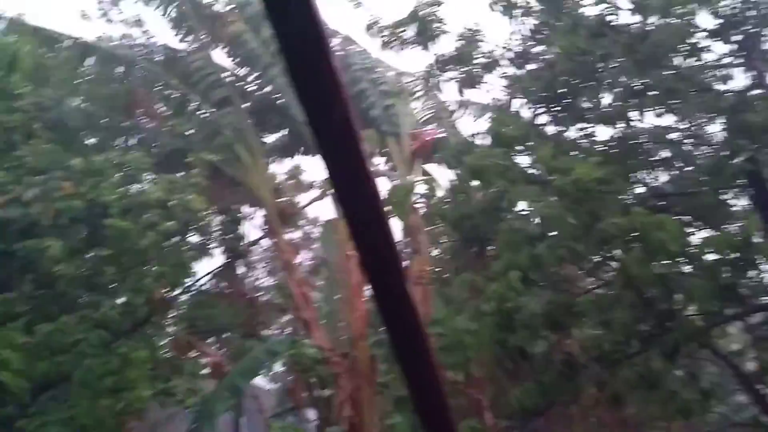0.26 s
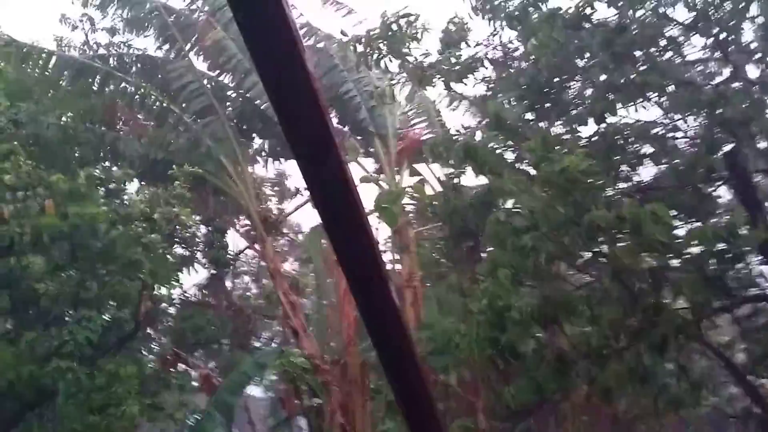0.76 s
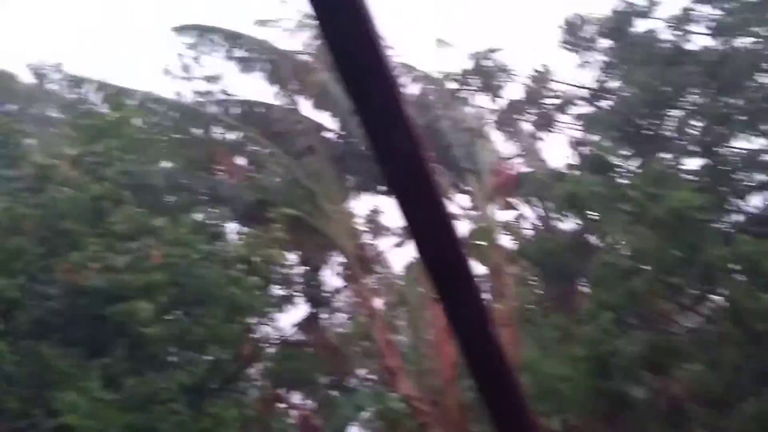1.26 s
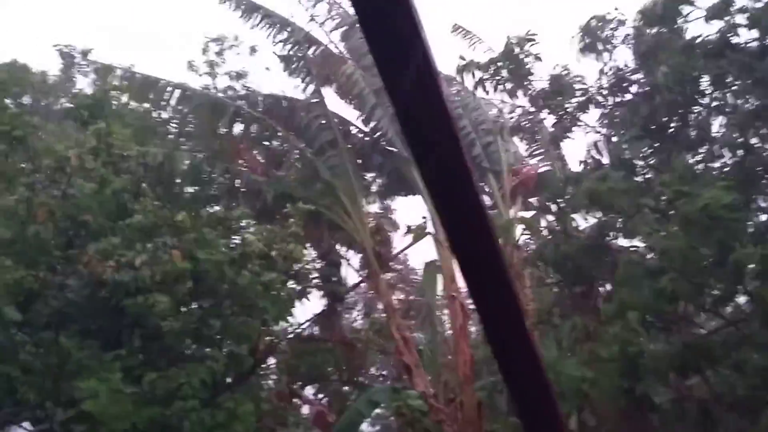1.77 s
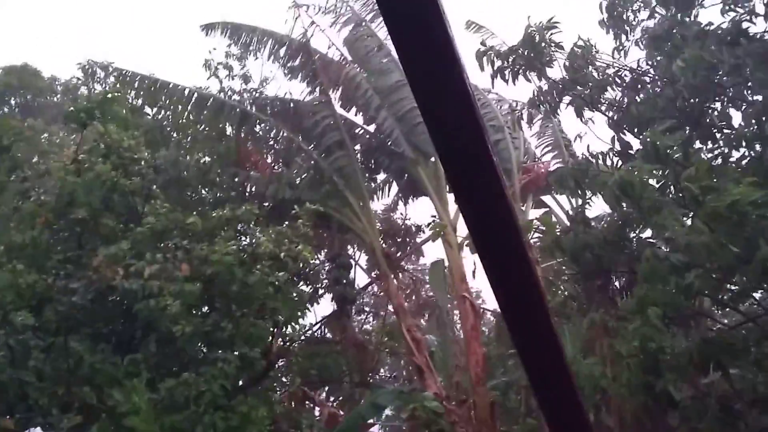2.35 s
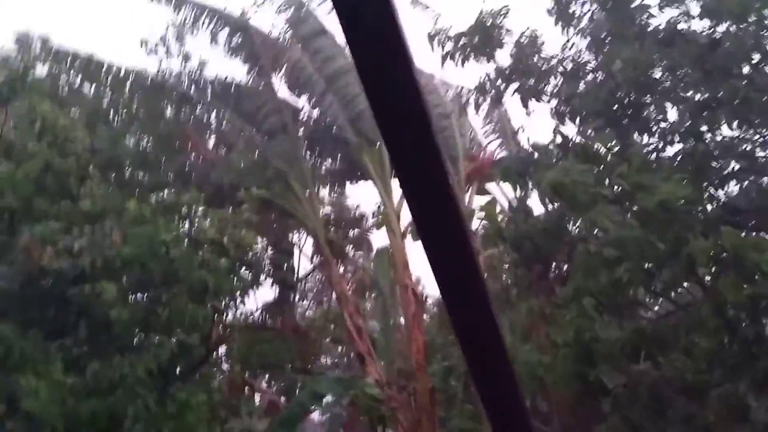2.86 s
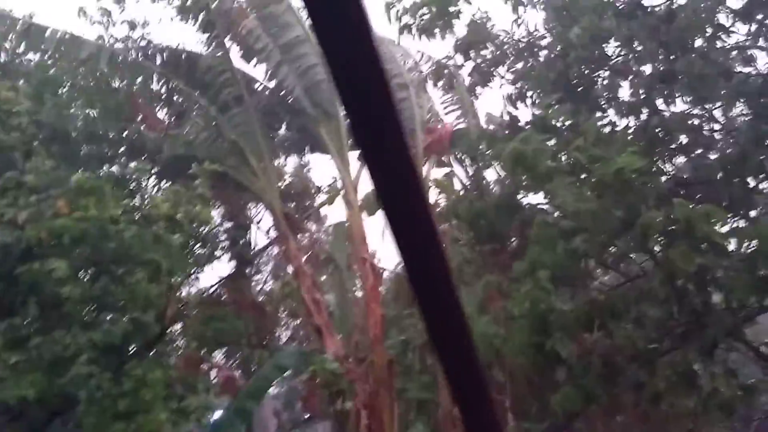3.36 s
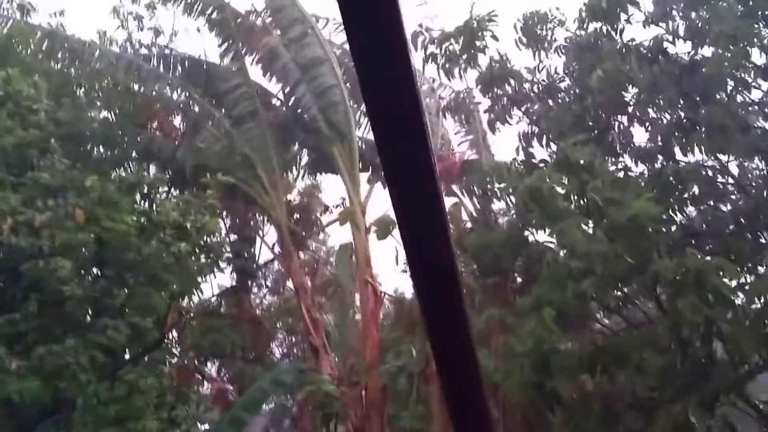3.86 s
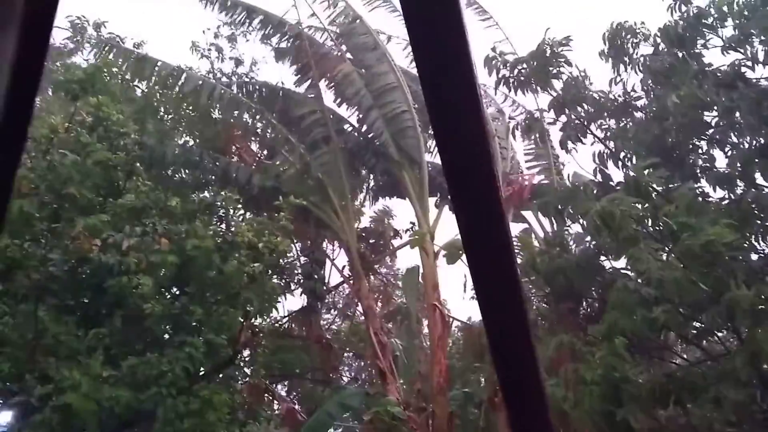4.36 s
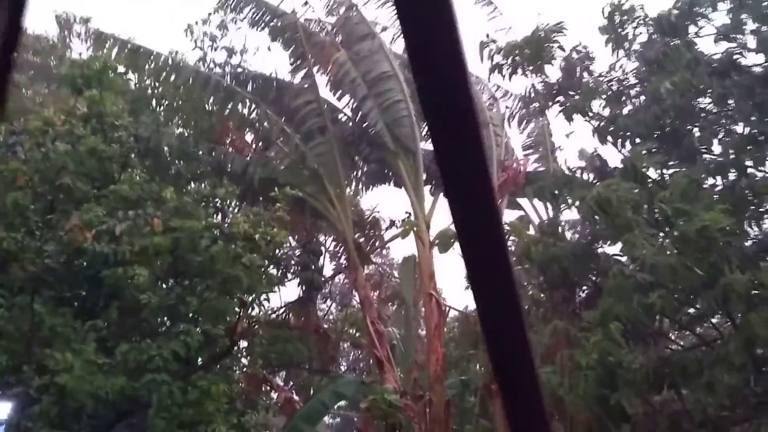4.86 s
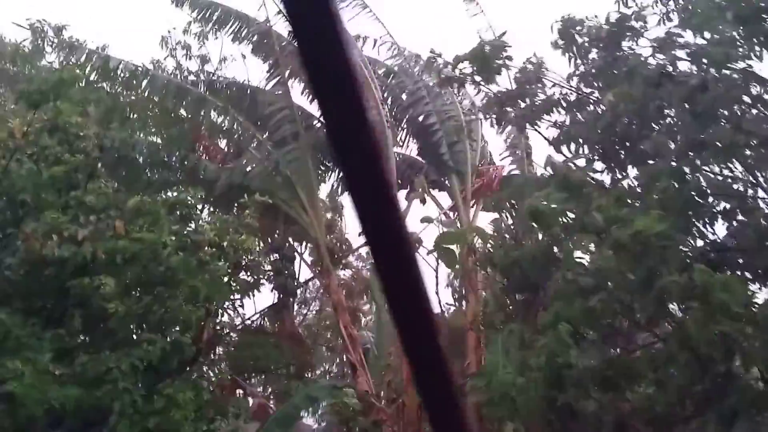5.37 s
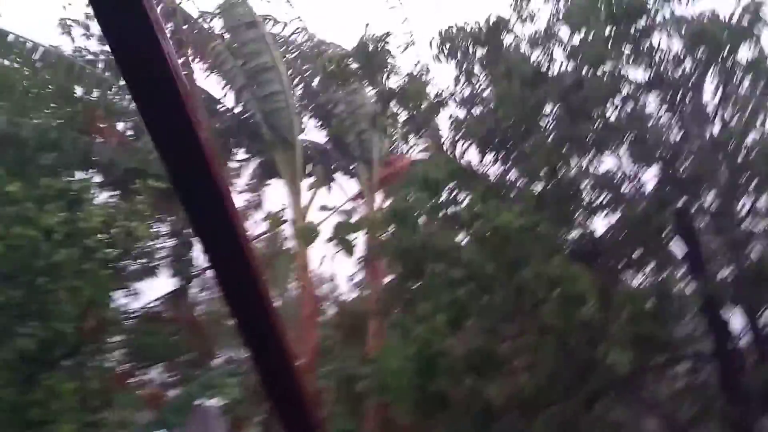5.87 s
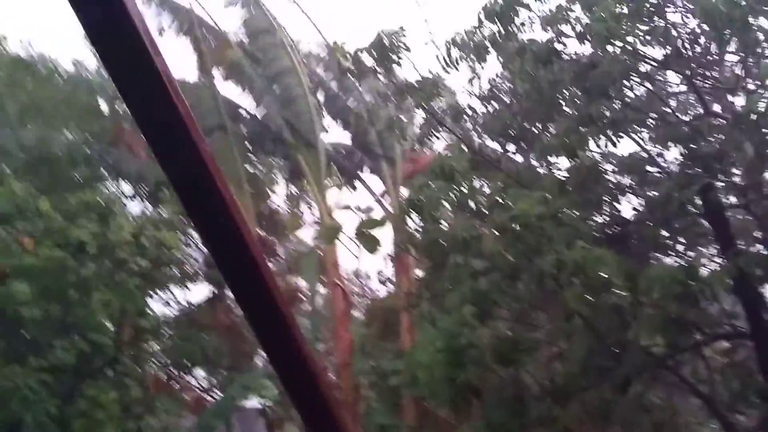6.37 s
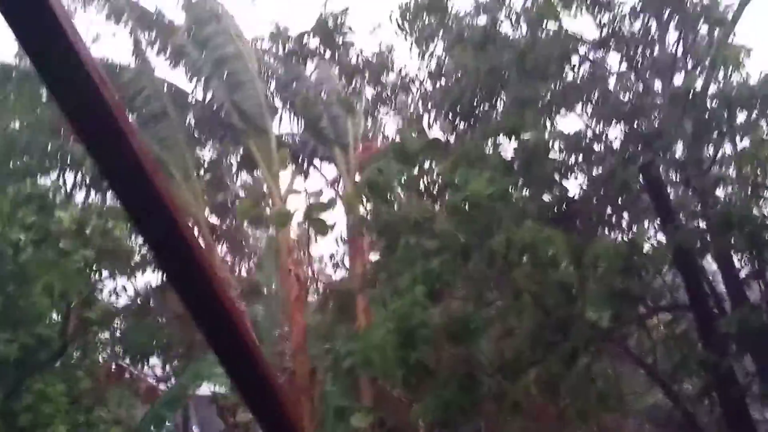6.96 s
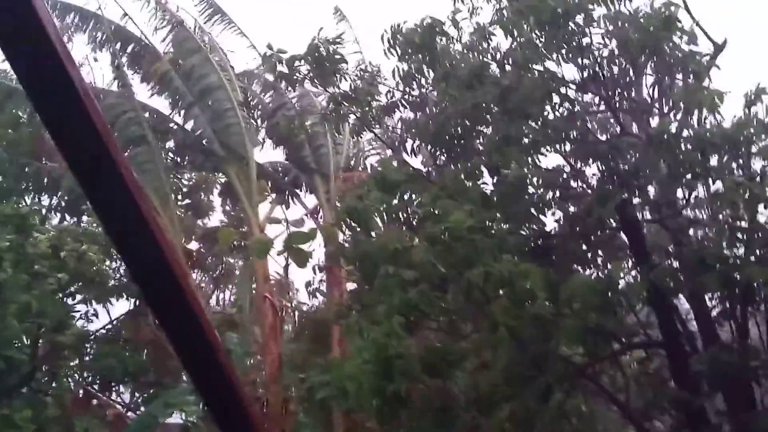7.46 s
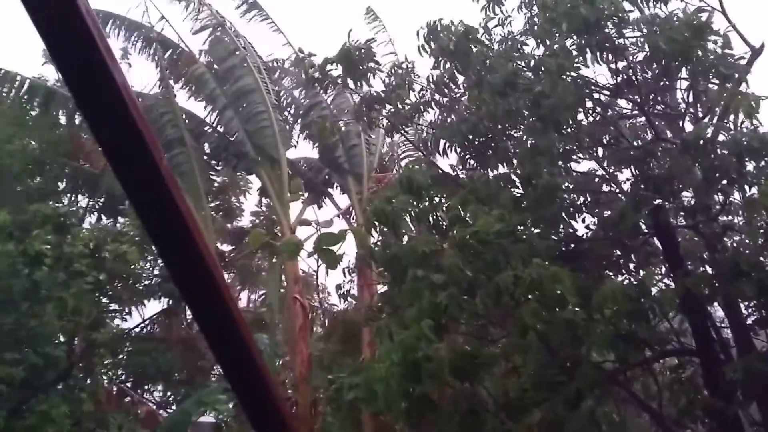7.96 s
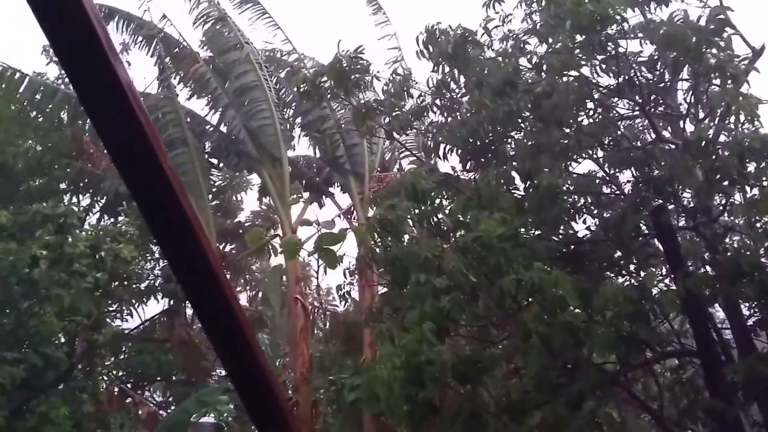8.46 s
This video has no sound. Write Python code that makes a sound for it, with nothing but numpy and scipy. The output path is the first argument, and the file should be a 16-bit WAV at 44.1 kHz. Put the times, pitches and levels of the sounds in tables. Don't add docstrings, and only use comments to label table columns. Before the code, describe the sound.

Heavy rain drums steadily on a sheet-metal roof, a dense bright roar with low panel booms in the gusts and one sharp crack nearby.

```python
import sys
import numpy as np
from scipy import signal
from scipy.fft import rfft, irfft
from scipy.io import wavfile
from scipy.ndimage import uniform_filter1d

SR = 44100
rng = np.random.default_rng(int(sys.argv[2]) if len(sys.argv) > 2 else 0)


def gain_from_decibels(decibels):
    exponent = np.asarray(decibels, float) / 20
    return 10 ** exponent


def store_pcm(level_fs):
    pcm = np.round(np.clip(level_fs, -1, 1) * 32767).astype(np.int16)
    wavfile.write(sys.argv[1], SR, np.atleast_2d(pcm).T)


N = 384111
HZ = np.maximum(np.fft.rfftfreq(N, 1 / SR), 1)

# (frequency [Hz], level [dB])
RAIN_TONE = [(30, -38), (45, -22), (62, -12), (90, -10.5), (200, -4), (350, -4.5), (600, 0.5), (1100, 1),
             (1900, 0), (2600, -5), (3800, -9), (5500, -14), (8000, -21), (11000, -23.5), (15000, -26.5)]
# (time [s], level [dB])
RAINFALL = [(0, -18), (.25, -18), (.6, -18), (1.0, -18), (1.22, -19.5), (1.42, -17), (2.0, -16.5),
            (2.2, -17), (2.8, -20), (3.25, -17.5), (4.6, -17.5), (5.05, -19.5), (5.55, -17.5),
            (6.35, -19.5), (6.55, -17), (7.1, -17.5), (7.8, -19), (8.71, -18)]
SPRAY_DB_PER_DB = -0.2
# (time [s], level [dB], time to fall 60 dB [s])
CRACK = (3.3964, -15.5, .0055)
# (time [s], strength over rest [dB], length [s])
GUSTS = [(.36, 9, .25), (.62, 5, 0.36), (.9, 5, .25), (1.5, 9, 0.11), (1.88, 4.5, 0.18), (2.2, 4, .15),
         (3.2, 1, .12), (3.795, 8.5, 0.22), (4.087, 12.5, 0.11), (4.28, 12, 0.25), (4.466, 5.5, .16),
         (4.707, 10, 0.32), (4.95, 9.5, 0.23), (5.12, 6.5, .15), (5.592, 12, 0.11), (5.97, 11.5, 0.33),
         (6.28, 5.5, .15), (6.53, -2, .12), (6.75, 6, 0.14), (7.15, 4, 0.19), (7.58, 4, 0.35),
         (8.33, 5, 0.11)]
PANEL_HZ, PANEL_WIDTH_HZ, PANEL_DB, PANEL_PAN_DB = 145.3, 34, -15.5, 2.8
REST_DB, RATTLE_DB = -5, -3
WIND_HZ, WIND_DB = 69, -35.5
# (time [s], depth [dB])
DUCKS = [(.47, 1.5), (.73, 1), (1.07, -2), (1.53, 2.5), (1.67, 3), (1.92, 3.5), (2.33, 1.5), (2.61, 2.5),
         (3.397, 11), (4.309, 3.5), (4.74, 1.5), (5.35, 1.5), (5.61, 3.5), (5.94, 0), (6.11, 2), (7.3, 1),
         (7.74, 0.7), (8.36, 2)]
DUCK_S, RECOVER_DB_PER_S = .002, 14.5
# (frequency [Hz], width [Hz], boost [dB])
PORTS = [
    (12020, 1900, 15.5),
    (12250, 2260, 22),
]
# (frequency [Hz], share [0-1])
CROSS = [(100, .8), (1200, .94), (2300, .81), (4700, .7), (6000, .53), (7000, .41), (8200, .36),
         (10000, .25), (14000, .26)]
# (frequency [Hz], turn [rad])
CROSS_TURN = [(1100, .16), (2300, .25), (3500, .05), (4750, 0), (5900, .24), (8100, .42), (9600, -.08),
              (12000, -.25)]
CROSS_LAG_S, SPACING_M = .00042, .145
CROSS_LEAN_DB, CROSS_WANDER_RAD = 0.5, .12
LOW_HZ, TOP_HZ = 42, 14240


def table(points):
    hz, value = np.transpose(points)
    return np.interp(np.log(HZ), np.log(hz), value)


def shape(x, gain):
    return irfft(rfft(x) * gain, N)


def resonance(hz, width_hz):
    return 1 / (1 + 1j * (HZ ** 2 - hz ** 2) / (HZ * width_hz))


def unit(x):
    return x / np.sqrt(np.mean(x ** 2))


def walk(rate):
    hold = int(SR / rate)
    steps = np.repeat(rng.standard_normal(N // hold + 1), hold)
    smooth = uniform_filter1d(uniform_filter1d(steps, hold), hold)
    return unit(smooth[:N])


def alike_at_ports():
    return np.sinc(2 * HZ * SPACING_M / 343)


def drops(rate, spread_db, ring_s):
    chance, size = rng.random((2, N))
    energy = (chance < rate / SR) * gain_from_decibels(-2 * spread_db * np.log(1 - size))
    keep = np.exp(-1 / (ring_s * SR))
    ringing = signal.lfilter([1], [1, -keep], energy)
    return unit(np.sqrt(ringing) * rng.standard_normal(N))


def rain(bright_db):
    common, differ = (rfft(drops(rate=9000, spread_db=2.0, ring_s=0.0031)) for _ in range(2))
    alike = np.clip(alike_at_ports(), -1, 1)
    mid = common * np.sqrt(1 + alike)
    side = differ * np.sqrt(1 - alike)
    ports = np.array([mid + side, mid - side]) * gain_from_decibels(table(RAIN_TONE))

    waves = walk(24)
    waves = unit(waves - uniform_filter1d(waves, SR // 6))
    out = 0
    for octave in range(5, 15):
        distance = abs(np.log2(np.clip(HZ, 32, 16384)) - octave)
        band = np.clip(1 - distance, 0, 1)
        high = np.clip((octave - 10) / 2, 0, 1)
        flicker_db = high * (bright_db + 0.57 * waves) + 0.41 * walk(12)
        out = out + irfft(ports * band, N) * gain_from_decibels(flicker_db)
    return unit(out)


def crack():
    s, db, t60 = CRACK
    age = np.clip(np.arange(N) / SR - s, 0, 1)
    burst = np.minimum(age / .0005, 1) * gain_from_decibels(db - 60 * age / t60)
    return burst * rng.standard_normal((2, N))


def shaking(t):
    s, db, length = np.array(GUSTS).T[:, :, None]
    coarse = t[::64]
    bells = (db * np.exp(-(2 * (coarse - s) / length) ** 2)).sum(axis=0)
    return REST_DB + np.interp(t, coarse, bells) + RATTLE_DB * walk(6)


def panel(boom_db):
    hum = shape(rng.standard_normal(N), resonance(PANEL_HZ, PANEL_WIDTH_HZ))
    hum = hum / uniform_filter1d(hum ** 2, SR // 16) ** .4
    boom = shape(unit(hum) * gain_from_decibels(PANEL_DB + boom_db), resonance(PANEL_HZ, 70))
    return np.array([boom * gain_from_decibels(PANEL_PAN_DB / 2), boom * gain_from_decibels(-PANEL_PAN_DB / 2)])


def wind():
    puff_db = 2.2 * np.array([walk(5.0), walk(5.5)])
    puffs = rng.standard_normal((2, N)) * gain_from_decibels(puff_db)
    return unit(shape(puffs, resonance(WIND_HZ, 93) ** 2)) * gain_from_decibels(WIND_DB)


def gain_db(t):
    down = []
    for s, db in DUCKS:
        onset = np.clip((t - s) / DUCK_S, 0, 1)
        down.append(onset * np.maximum(db - RECOVER_DB_PER_S * (t - s), 0))
    return -np.max(down, axis=0)


def scene():
    t = np.arange(N) / SR
    rain_db = np.interp(t, *np.transpose(RAINFALL))
    mean_db = rain_db.mean()
    swell_db = rain_db - mean_db
    roof = rain(SPRAY_DB_PER_DB * swell_db) * gain_from_decibels(swell_db)
    level_db = mean_db - 2.0 + gain_db(t)
    return (roof + panel(shaking(t)) + wind()) * gain_from_decibels(level_db) + crack()


def top_cut(x):
    return signal.sosfilt(signal.butter(12, 14960, fs=SR, output="sos"), x)


def record(dry):
    mics = np.array([shape(x, 1 + gain_from_decibels(db) * resonance(hz, width)) for x, (hz, width, db) in zip(dry, PORTS)])
    share = np.clip(table(CROSS), 0, 1)
    turn = 2 * np.pi * HZ * CROSS_LAG_S + table(CROSS_TURN)
    even = np.sqrt(1 + share ** 2 - 2 * share * alike_at_ports() * np.cos(turn))
    low_cut = 1 / (1 + (LOW_HZ / HZ) ** 4)

    depth_db = 1.1 * walk(16)
    crossed = shape(mics[::-1], share * np.exp(-1j * turn)) * gain_from_decibels(depth_db)
    wander = np.exp(1j * CROSS_WANDER_RAD * walk(12))
    lean = gain_from_decibels(CROSS_LEAN_DB * np.array([[-1], [1]]))
    crossed = (signal.hilbert(crossed) * wander).real * lean
    wide = shape(mics - crossed, (HZ < TOP_HZ) * low_cut / even) * gain_from_decibels(-.25 * depth_db)
    return top_cut(wide)


dry = scene()
out = record(dry)
store_pcm(out)
```